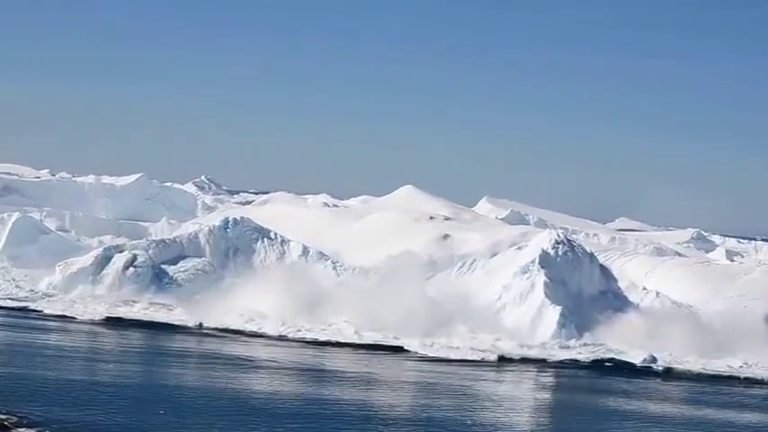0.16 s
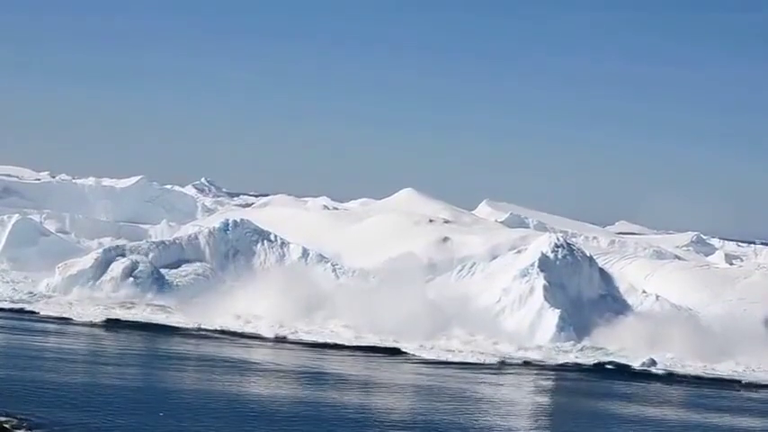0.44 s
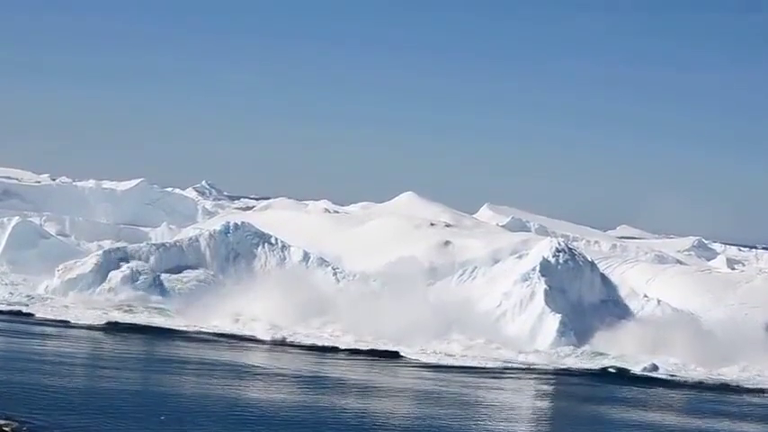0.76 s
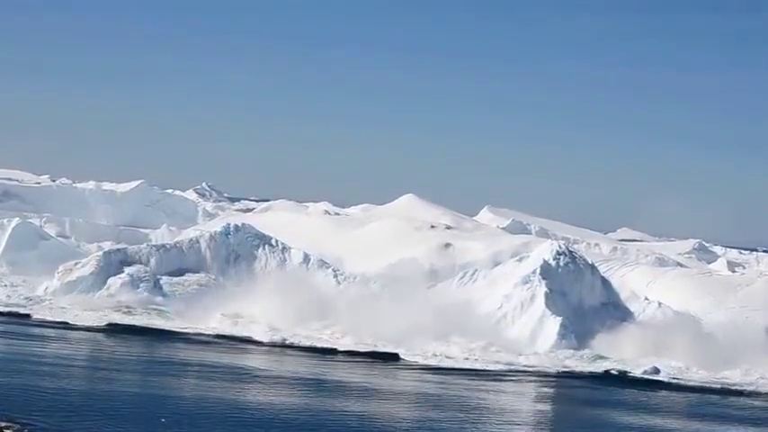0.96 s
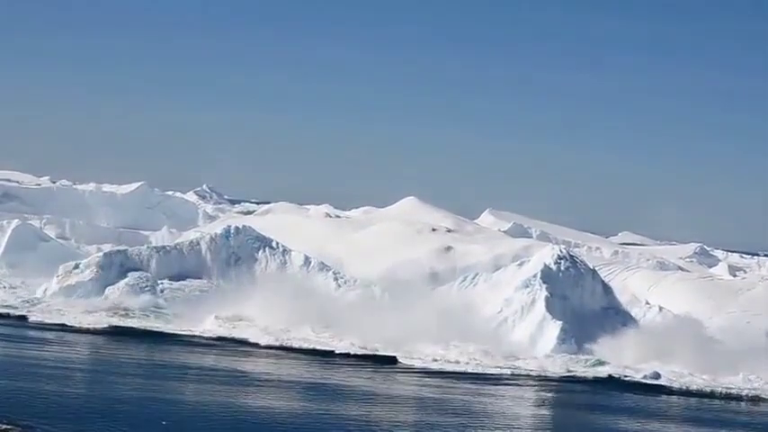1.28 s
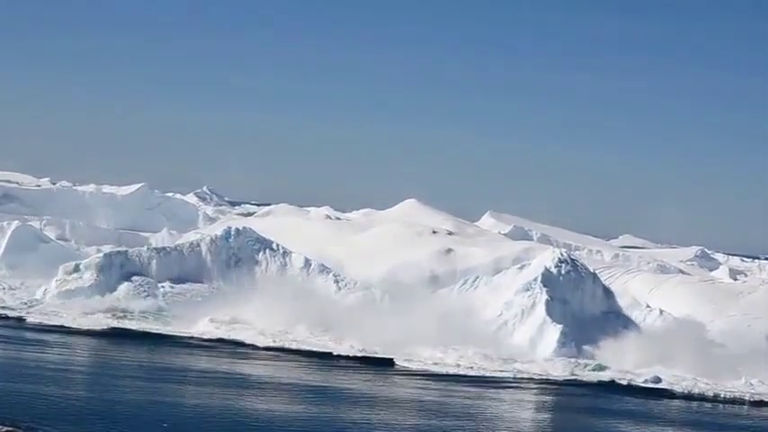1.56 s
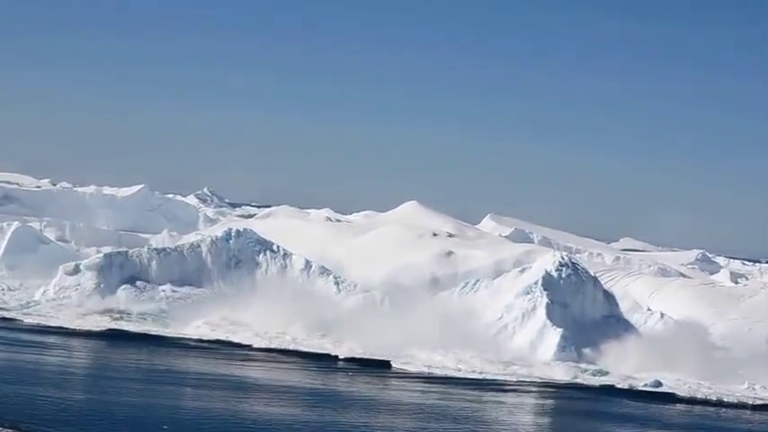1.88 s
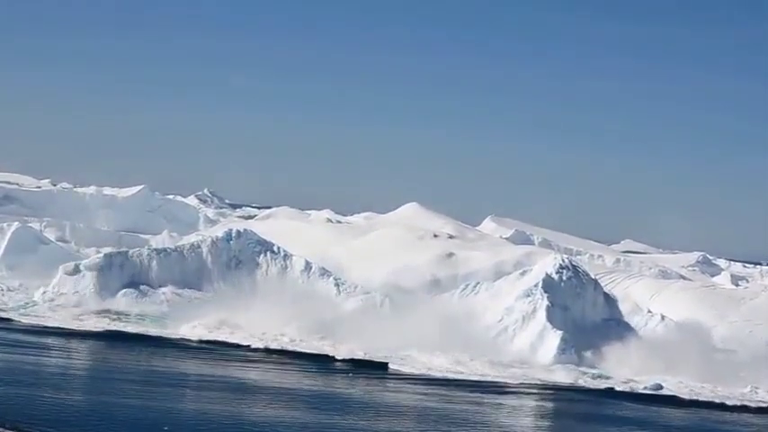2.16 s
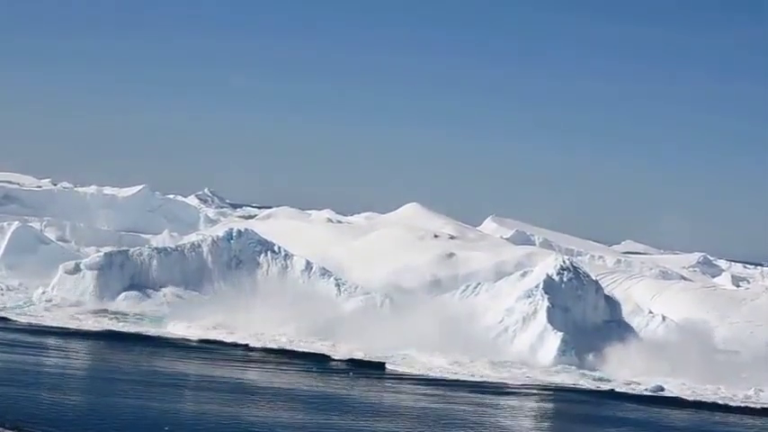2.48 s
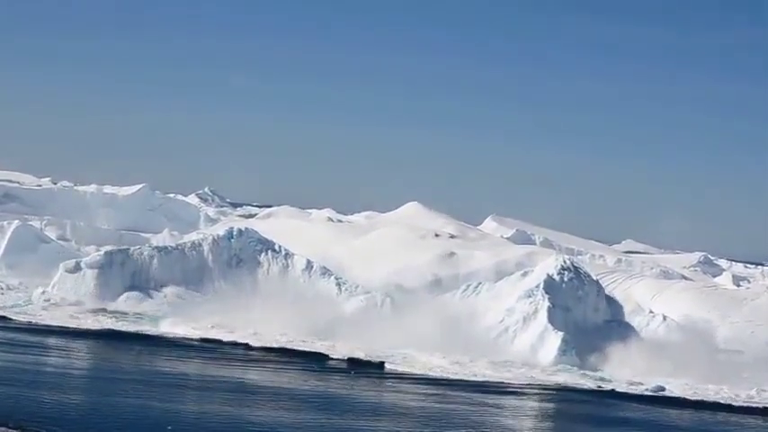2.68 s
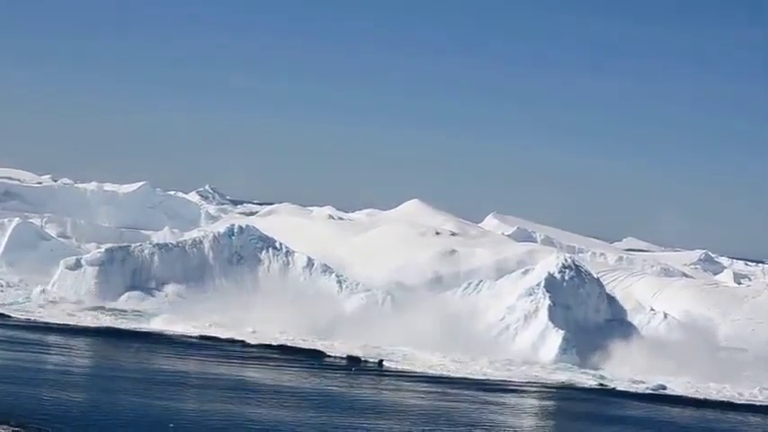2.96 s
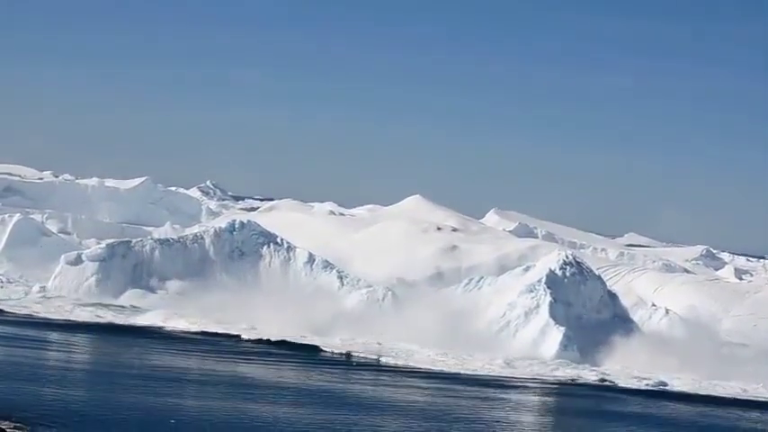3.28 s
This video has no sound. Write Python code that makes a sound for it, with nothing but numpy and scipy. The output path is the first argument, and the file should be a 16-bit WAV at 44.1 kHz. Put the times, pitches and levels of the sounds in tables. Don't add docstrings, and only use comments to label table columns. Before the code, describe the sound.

Steady dull rumbling roar of ice collapsing into the sea at a distance, already going and barely changing, with faint close handling clicks early, one soft distant thud later, and quiet mono microphone hiss.

```python
import sys
import numpy as np
from scipy import signal
from scipy.fft import rfft, irfft
from scipy.io import wavfile

SR = 44100
rng = np.random.default_rng(int(sys.argv[2]) if len(sys.argv) > 2 else 0)


def master_out(mix):
    frames = np.transpose(np.atleast_2d(mix))
    ceiling = np.clip(frames, -1, 1)
    pcm = np.round(ceiling * 32767).astype(np.int16)
    wavfile.write(sys.argv[1], SR, pcm)


def elevation(decibels):
    levels = np.asarray(decibels, float)
    return 10 ** (levels / 20)


N = 151263

# time in seconds, level in dB.
COLLAPSE_VIGOUR = [
    (0.0, -23.5),
    (0.99, -24.5),
    (1.05, -25),
    (1.09, -23.5),
    (3.07, -24.5),
    (3.43, -25),
]
# frequency in Hz, level in dB per Hz.
ROAR_COLOUR = [(22, -31), (45, -18), (190, -1.5), (800, 0.5), (1400, -5), (2500, -18.5), (3900, -45),
               (7000, -79)]
# centre in Hz, width in Hz, depth in dB.
REFLECTION_NOTCHES = [(54, 20, -7.5), (299.8, 35, -6.5), (381.6, 130, -6), (608.4, 132, -16),
                      (980, 250, -3.5), (1968, 220, -6), (3200, 850, -7.5), (4320, 400, -6),
                      (5300, 400, -4)]
# frequency in Hz, level in dB per Hz.
HISS_COLOUR = [(3000, 3), (5500, 1), (7000, 1.5), (10000, 0), (12000, -3.5), (15500, -5)]
# centre in Hz, width in Hz, lift in dB.
HOUSING_RINGS = [(7200, 400, 4), (9800, 700, 2.5)]
# start in seconds, end in seconds, level in dB, centre in Hz,
# width in Hz.
FINGER_RUBS = [
    (0.044, .066, -74, 5800, 3000),
    (0.087, .15, -81, 5570, 3020),
    (0.102, .14, -84, 12000, 6000),
    (.887, .914, -76, 9300, 2200),
    (.886, .935, -77.5, 5300, 2000),
    (0.912, .942, -80, 9500, 4000),
    (3.23, 3.251, -79, 6500, 4500),
]
# start in seconds, peak level in dB, centre in Hz, width in Hz,
# time to fall 60 dB in seconds.
SHELL_TICKS = [(.0453, -66, 6000, 4500, .008), (.0516, -60, 5730, 2500, .015),
               (.052, -73.5, 10900, 8000, .01), (.0936, -60, 7000, 8000, 0.015),
               (.1086, -70, 12800, 1000, .015), (.1101, -70, 5460, 2500, .01),
               (0.1202, -80, 10900, 9000, .025), (0.205, -64.5, 6500, 6000, 0.01),
               (0.9153, -47, 7800, 6950, 0.0057), (.9153, -55.5, 5500, 1800, .012),
               (.9151, -66, 14500, 2500, 0.0053), (.920, -66, 10000, 4000, .008),
               (0.929, -67, 9000, 4950, .03)]


def rms_one(x):
    return x / np.sqrt(np.mean(x ** 2) + 1e-20)


def spectrum_hz():
    return np.maximum(np.fft.rfftfreq(N, 1 / SR), 1)


def at_hz(points, hz):
    point_hz, point_db = np.transpose(points)
    return np.interp(np.log(hz), np.log(point_hz), point_db)


def bumps_db(rows, hz):
    return sum(db / (1 + (2 * (hz - centre) / width) ** 2) for centre, width, db in rows)


def drift(per_s):
    pole = np.exp(-80 * np.pi * per_s / SR)
    noise = rng.standard_normal(N // 40 + 2002)
    slow = signal.lfilter([1], [1, -2 * pole, pole * pole], noise)[2000:]
    return np.interp(np.arange(N) / 40, np.arange(len(slow)), rms_one(slow))


def band(x, hz, width_hz):
    edges = np.clip([hz - width_hz / 2, hz + width_hz / 2], 100, 0.45 * SR)
    return signal.sosfilt(signal.butter(2, edges, "band", fs=SR, output="sos"), x)


def burst(s, db, hz, width_hz, t60, noise):
    i = np.arange(len(noise))
    dying = (noise + 2.4 * (i == 0)) * elevation(-60 * i / SR / t60)
    shape = band(dying, hz, width_hz)
    out, start = np.zeros(N), int(s * SR)
    out[start:start + len(noise)] = elevation(db) * shape / abs(shape).max()
    return out


def collapse():
    swell_db, swell_per_s = 0.51, 4.5
    flicker_db, flicker_per_s = 0.57, 11
    hz = spectrum_hz()
    colour_db = at_hz(ROAR_COLOUR, hz) + bumps_db(REFLECTION_NOTCHES, hz)
    spectrum = rfft(rng.standard_normal(N)) * elevation(colour_db)
    half_octave = np.clip(2 * np.log2(hz / 30), 0, 15)
    swell = swell_db * drift(swell_per_s)
    roar = np.zeros(N)
    for k in range(16):
        share = np.clip(1 - abs(half_octave - k), 0, 1)
        roar += irfft(spectrum * share, N) * elevation(swell + flicker_db * drift(flicker_per_s))
    s, db = np.transpose(COLLAPSE_VIGOUR)
    return elevation(np.interp(np.arange(N) / SR, s, db)) * rms_one(roar)


def hiss():
    hz = spectrum_hz()
    colour = elevation(at_hz(HISS_COLOUR, hz) + bumps_db(HOUSING_RINGS, hz))
    return elevation(-82.5) * rms_one(irfft(rfft(rng.standard_normal(N)) * colour, N))


def finger_rubs():
    grains_per_s = 2500
    catches = rng.random(N) < grains_per_s / SR
    grains = rng.standard_normal(N) * (0.5 + 2.5 * catches)
    t = np.arange(N) / SR
    out = np.zeros(N)
    for start, end, db, hz, width_hz in FINGER_RUBS:
        touching = (t > start) & (t < end)
        out += elevation(db) * touching * rms_one(band(grains, hz, width_hz))
    return out


def shell_ticks():
    return sum(burst(*row, rng.standard_normal(3000)) for row in SHELL_TICKS)


def falling_block():
    thud = burst(2.0335, -14, hz=800, width_hz=200, t60=0.05, noise=rng.standard_normal(4000))
    return signal.sosfilt(signal.butter(8, 1600, fs=SR, output="sos"), thud)


def scene():
    return (collapse() + finger_rubs() + shell_ticks() + falling_block())[None]


def roll_off(x):
    return signal.sosfilt(signal.butter(12, 15480, fs=SR, output="sos"), x)


def record(dry):
    fade_s = 0.003
    t = np.arange(N) / SR
    to_edge = np.minimum(t, t[-1] - t)
    ease = np.sin(np.pi / 2 * np.clip(to_edge / fade_s, 0, 1)) ** 2
    return roll_off(ease * dry + hiss())


dry = scene()
out = record(dry)
master_out(out)
```